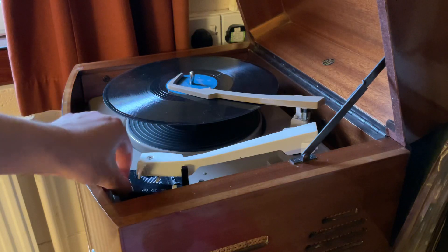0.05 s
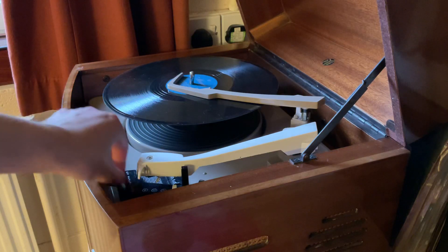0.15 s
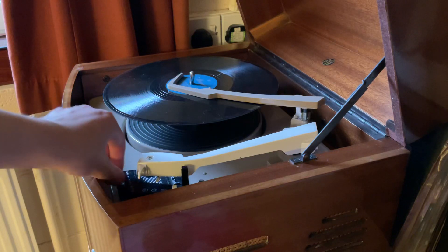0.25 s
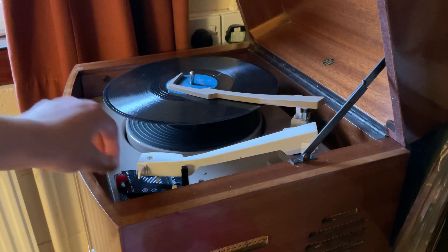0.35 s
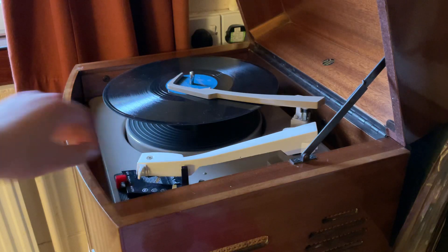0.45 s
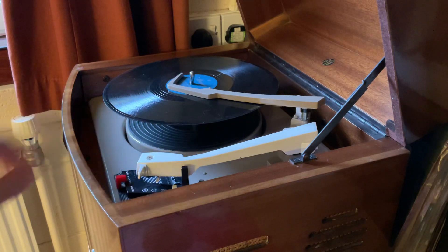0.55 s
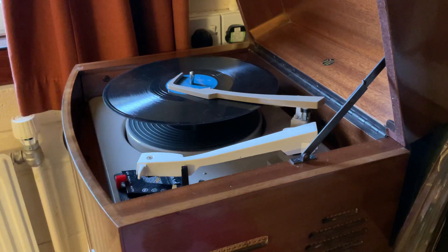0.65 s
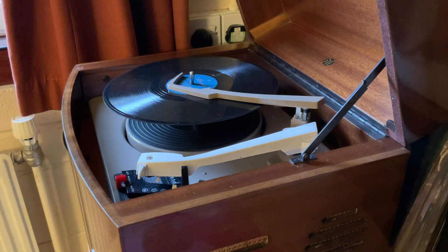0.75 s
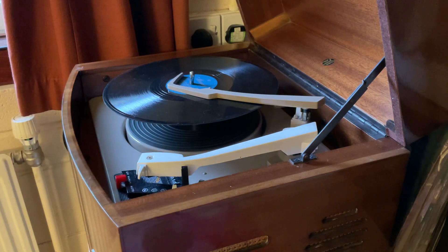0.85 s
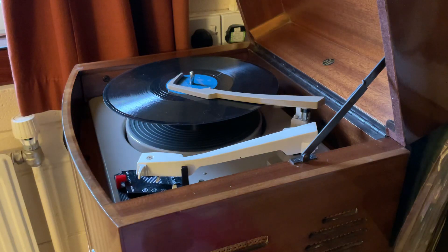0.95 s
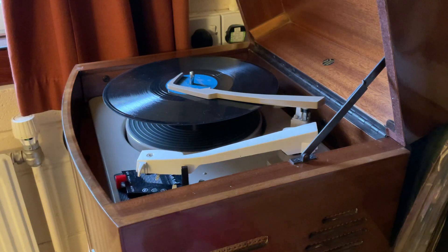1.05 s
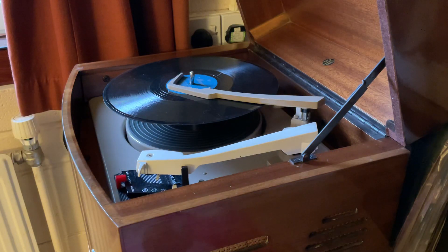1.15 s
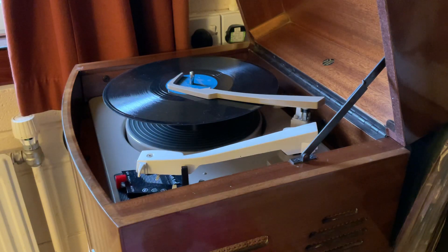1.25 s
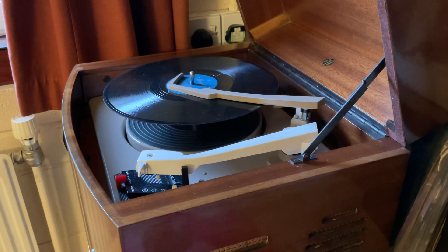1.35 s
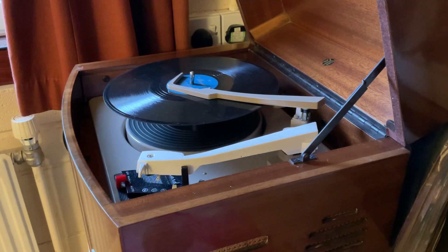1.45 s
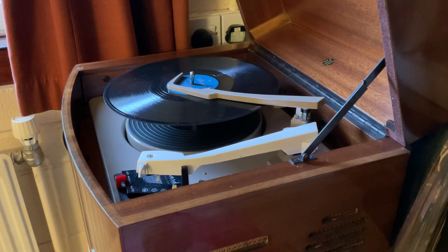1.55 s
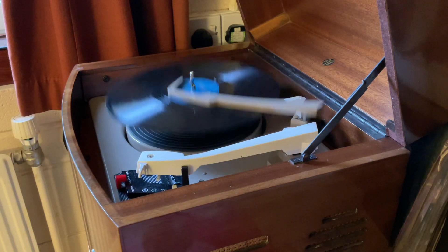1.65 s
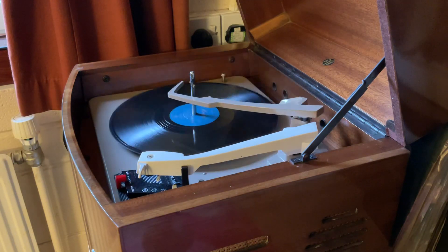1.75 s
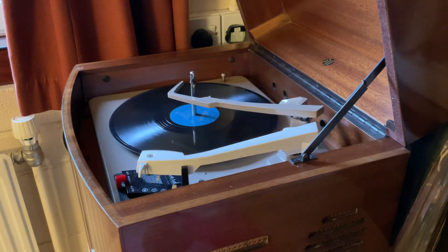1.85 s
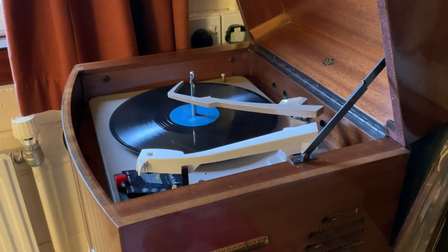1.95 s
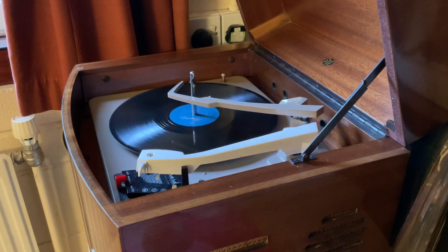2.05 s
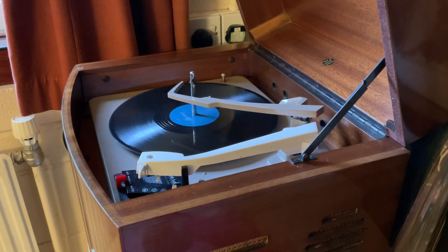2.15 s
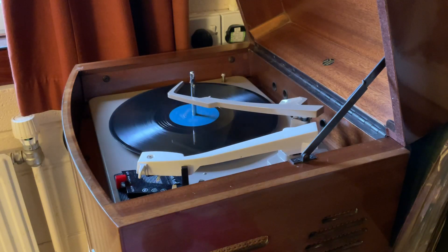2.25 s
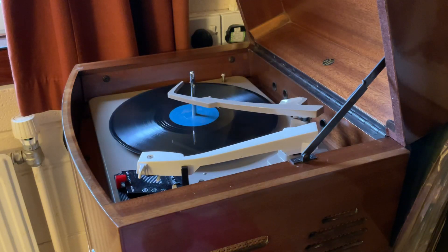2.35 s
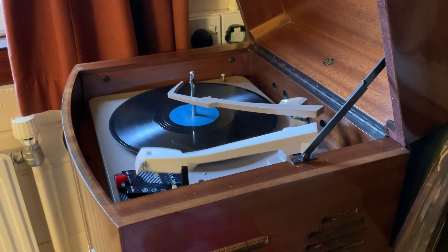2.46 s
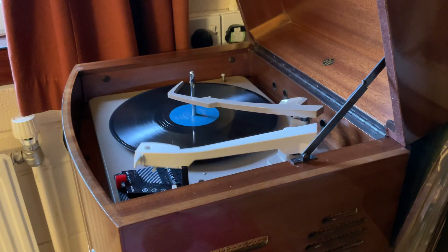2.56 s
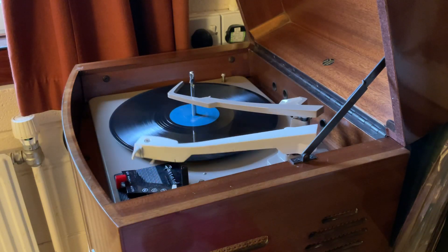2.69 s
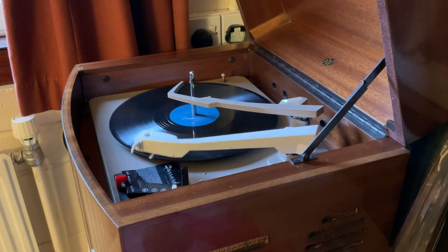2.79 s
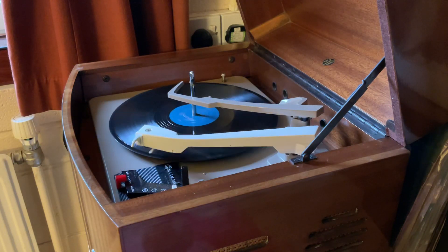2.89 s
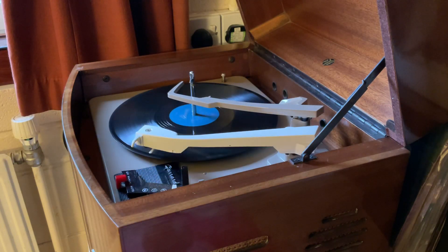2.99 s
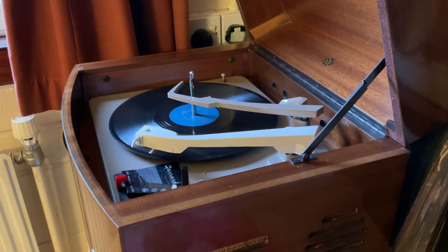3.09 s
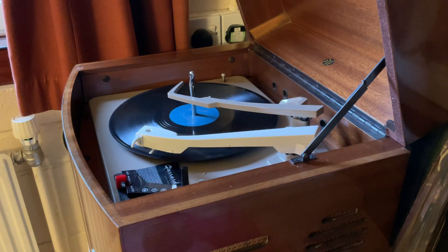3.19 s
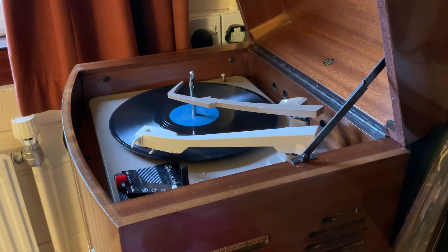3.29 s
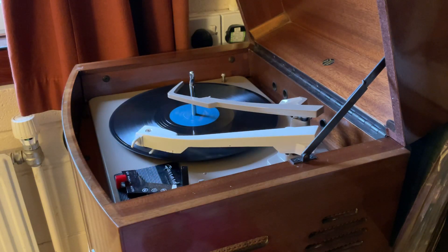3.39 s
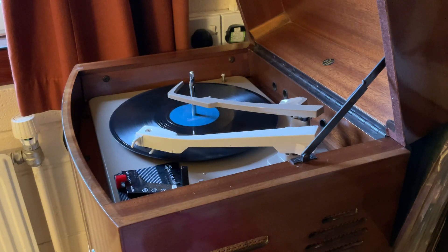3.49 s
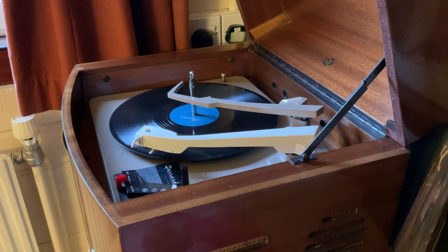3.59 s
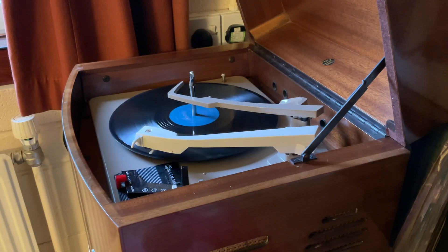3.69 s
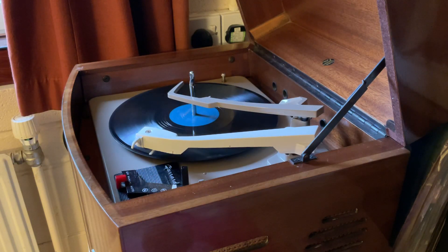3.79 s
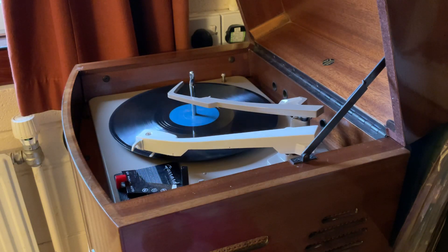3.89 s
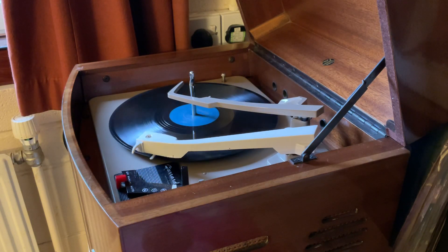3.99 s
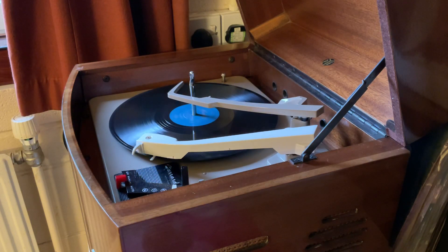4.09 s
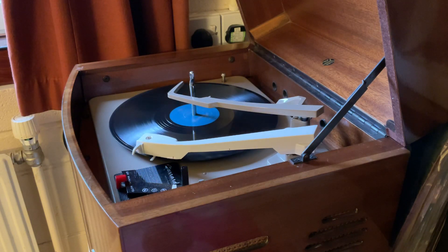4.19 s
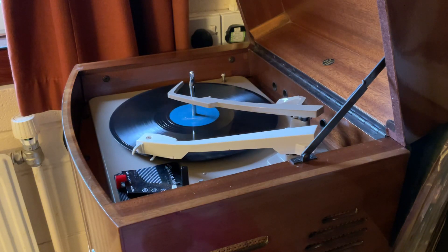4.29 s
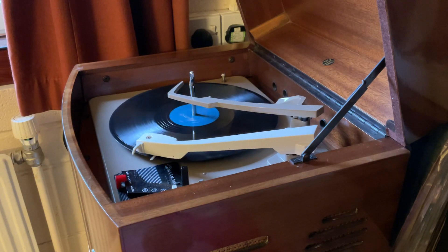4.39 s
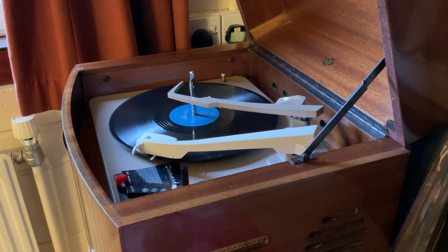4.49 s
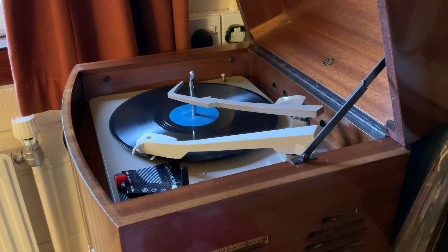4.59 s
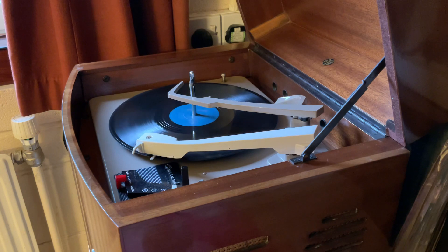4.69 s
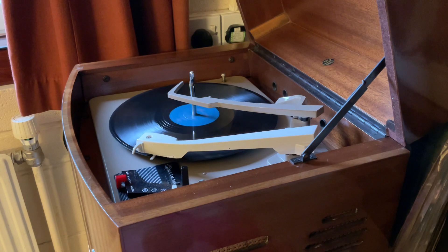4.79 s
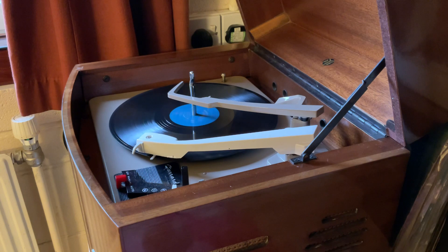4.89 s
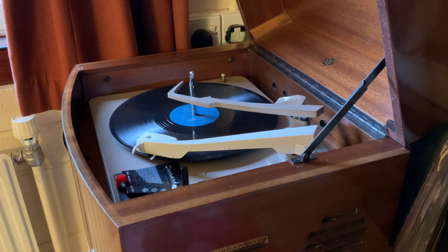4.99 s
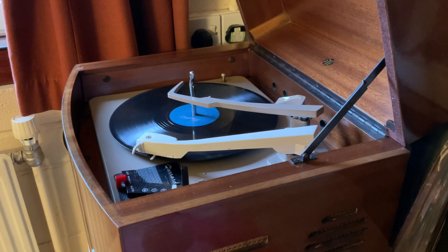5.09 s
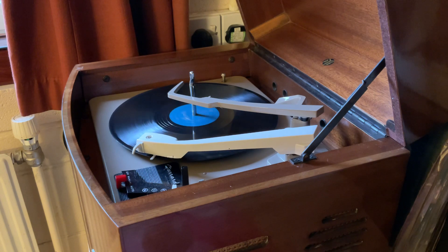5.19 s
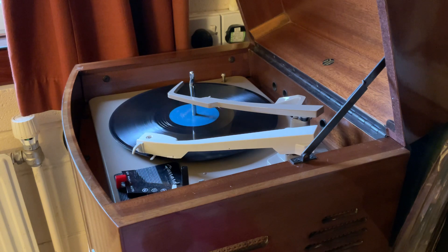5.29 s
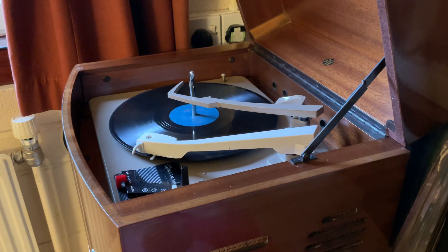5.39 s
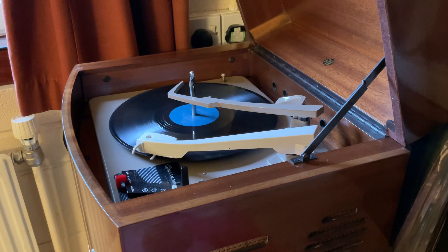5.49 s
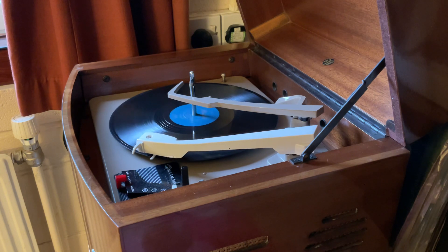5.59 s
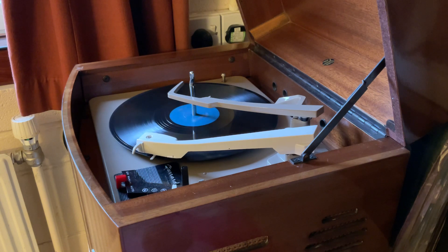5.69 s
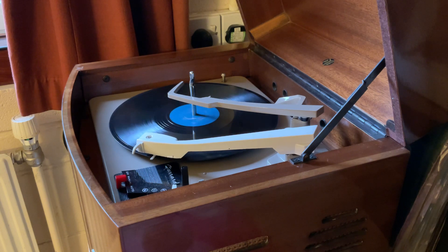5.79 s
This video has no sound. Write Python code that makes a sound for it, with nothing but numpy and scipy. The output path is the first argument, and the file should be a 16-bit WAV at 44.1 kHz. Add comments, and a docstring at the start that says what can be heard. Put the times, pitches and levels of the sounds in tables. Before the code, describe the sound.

Close stereo pickup at an open wooden record player in a quiet room. A knob clacks sharply, gears chatter faintly and a lever snaps. A record scrapes down the spindle and lands with a big clattering thump, followed by a metallic clunk. The arm mechanism ticks softly, the needle lands with clicks and booms, then light surface crackle continues over low motor hum.

```python
"""Automatic record changer

An open wooden cabinet, close by: a knob is turned, the cam gear chatters through its cycle and levers click.
A disc scrapes down the spindle and thumps on the platter; the needle lands and the groove hisses and crackles.
Levers and blows ring decaying tones of deck and cabinet; gear, scrapes and groove are shaped noise.
The motor hums throughout: two sines over low noise.
"""
import sys
import numpy as np
from scipy.fft import rfft, irfft, next_fast_len
from scipy.io import wavfile
from scipy.ndimage import map_coordinates

SR = 44100
rng = np.random.default_rng(int(sys.argv[2]) if len(sys.argv) > 2 else 0)


def master(y):
    """Save y as 16-bit WAV."""
    cut = np.clip(np.atleast_2d(y).T, -1, 1)
    pcm = np.round(cut * 32767)  # scale
    wavfile.write(sys.argv[1], SR, pcm.astype(np.int16))


N = 257940
T = np.arange(N) / SR

# Levels in the tables are nominal: the layers add fixed trims.
# Low rumble spectrum. Each row: frequency in Hz, relative density in dB.
RUMBLE_SPECTRUM = [(15, -50), (25, -23.5), (43, -19), (85, -9), (149, -6), (208, -4), (345, -12),
                   (435, -15.5), (518, -22), (1060, -26), (1220, -34.5), (1600, -35), (2270, -37),
                   (2600, -53), (3380, -83), (5720, -120)]
# Low rumble in the cabinet: motor, swell after the disc drop, groans after 4.2 s.
# Each row: time in seconds, level in dB.
RUMBLE_LEVEL = [(0, -42), (.39, -53.5), (1.68, -51.5), (1.82, -40.5), (2, -53), (2.4, -52.5), (2.7, -56),
                (3.7, -56.5), (4.2, -49), (4.6, -49.5), (5.2, -54.5), (5.85, -53.5)]
# Surface hiss of the groove. Each row: time in seconds, level in dB.
GROOVE_LEVEL = [(4.01, -84), (4.06, -68), (4.3, -72), (4.5, -68.5), (5.2, -69.5), (5.53, -75),
                (5.849, -68.5)]
# Loudspeaker spectrum. Each row: frequency in Hz, relative density in dB.
SPEAKER_SPECTRUM = [(1590, -72.5), (2700, -43.5), (3040, -43), (3310, -18), (3410, -8.5), (3700, -18),
                    (4110, -17.5), (5260, -26), (5800, -10.5), (7160, -20), (8760, -8.5), (10700, -14),
                    (11600, -5.5), (14300, 0), (16200, -6)]
# Loudest groove pops. Each row: start in seconds, level in dB, middle over that level in dB.
POPS = [(4.8349, -48.5, -13.5), (4.8816, -52, -4), (4.9033, -41.5, -11), (4.9227, -46.5, -10),
        (5.0779, -51.5, -7), (5.1151, -56.5, 8), (5.1761, -50.5, -9.5), (5.244, -46, -25),
        (5.2614, -48, -20.5), (5.3077, -48.5, -11), (5.3871, -49, -19.5), (5.5838, -49, 2),
        (5.6291, -47.5, -.5), (5.6446, -37.5, -10.5), (5.7062, -46, -19)]
# Loose parts. Each row: frequency in Hz, relative density in dB.
RATTLE_SPECTRUM = [(600, -40), (900, 5.5), (2200, 4), (3500, 1), (5000, -2.5), (8000, -3.5), (12000, -8),
                   (16000, -14)]
# Arm linkage dragging over the deck. Each row: start in seconds, hold in seconds, level in dB.
SHUFFLES = [(2.855, .08, -56)]
# Disc slipping on the spindle, then falling along it. Each row: start in seconds, hold in seconds, level in dB.
SCRAPES = [(1.606, .042, -52.5), (1.654, .064, -26)]
# Flat of the disc or a plate pushing air. Each row: centre in seconds, level in dB, pitch in Hz.
SLAPS = [(1.368, -23.5, 230), (1.6885, -12.5, 150), (1.7075, -14.5, 190), (1.739, -11.5, 240),
         (4.152, -29, 230), (4.287, -32, 200), (4.717, -23, 188)]
# Low thumps: blows on the cabinet, and needle booms from the speaker after 4.2 s.
# Each row: start in seconds, level in dB, deep and upper parts over it in dB.
THUMPS = [(.001, -29, -14.5, -5.5), (.168, -32, -14.5, -7), (.327, -32.5, -21, -6.5), (.628, -40, -23, -7),
          (.729, -39.5, -8, -8.5), (1.202, -38, -12, -11.5), (1.365, -24, -18.5, -6),
          (1.399, -27.5, -16.5, -11.5), (1.617, -31.5, -13.5, -7), (1.655, -22, -3, -2),
          (1.681, -15, -14.5, -9), (1.699, -17.5, -8.5, -1), (1.713, -17.5, -10, -1),
          (1.736, -18.5, -10, -8.5), (1.974, -35, -22, -1.5), (1.986, -30, -17.5, -5),
          (2.289, -43, -9, -4.5), (2.858, -37, -16, -8), (2.889, -41, -7, -8), (2.929, -41, -13, -8),
          (3.129, -44, -6, -3), (3.279, -47, 3, -2), (3.845, -50.5, -6, 5), (3.919, -44.5, -1, -5),
          (4.147, -34, -2, -20), (4.164, -37, 0, -7), (4.276, -36.5, -9, -25), (4.332, -38, -11, -25),
          (4.369, -39, -13.5, -25), (4.399, -42, -10, -25), (4.443, -29.5, -18.5, -7.5),
          (4.47, -40, -12.5, -5.5), (4.588, -43.5, 2, -20), (4.709, -18.5, -9.5, -9.5), (4.726, -24, 1, -9),
          (4.749, -33, 4, -12.5)]
# Cabinet panel modes. Each row: frequency in Hz, level in dB, unscaled 60 dB decay time in seconds.
CABINET_MODES = [(65, -15.5, 0.27), (110, 1, .2), (122, 0, 0.17), (165, -3, .15), (190.4, -1, 0.071),
                 (219.4, 0.5, .15), (270, -3, .15), (283, -4.5, 0.24), (314, -0.5, 0.22),
                 (382, -2.5, 0.058), (422.7, 4.5, .14), (462, 1.5, 0.17), (554, -1, .1), (640, -5, .1),
                 (732, -5, 0.11), (765, -4.5, 0.15), (904, -2.5, 0.039)]
# Contacts: lever clicks, and the falling disc's hits near 1.66-1.72 s. Each row: start in seconds, treble level
# in dB, middle and top over the treble in dB, favoured ring in Hz, ring over the treble in dB.
CLICKS = [(.0004, -26, -5.5, -5, 5230, -11), (.083, -30, -31, -7.5, 7740, -6),
          (.1094, -45, 6, -.5, 3590, -7), (.1494, -22, -9, -3, 9900, -4),
          (.2169, -44, -3.5, -22, 5560, -11), (.3196, -28.5, 5.5, -14, 2860, -8.5),
          (.602, -57, 0, -19, 4070, -28), (.622, -46, 11, -20, 4180, -7), (.6444, -55, 15, -21, 4160, -7),
          (.6604, -59, 9, -33.5, 3100, 9.5), (.723, -41.5, -2.5, -29, 3770, -3),
          (.7494, -49, 5, -21, 3630, -9), (.7855, -49.5, -.5, -22, 6060, -5),
          (.9492, -56, -5.5, -12.5, 4240, -11), (1.0006, -58, -7, -32, 3580, -2.5),
          (1.0954, -53, -7.5, -12, 4700, -9), (1.156, -58.5, -4, -22, 4360, -4),
          (1.1683, -48, 4, -37, 6100, -9.5), (1.2226, -56, 1.5, -30, 4400, 3),
          (1.3074, -60, -1, -15, 4300, -12), (1.3492, -34, -11.5, -7.5, 3600, -26),
          (1.359, -26.5, -6.5, -9, 5400, -5.5), (1.4094, -37.5, -1, -17, 5000, -5),
          (1.6062, -44, 1.5, -4.5, 7340, -1.5), (1.6195, -38.5, .5, -1, 8480, -6),
          (1.657, -17, -8, -4, 5940, -8), (1.6595, -16, -5, -2, 8870, -11),
          (1.6724, -19, -6, -10.5, 3630, -3), (1.687, -12.5, -11.5, -12, 6410, -11.5),
          (1.696, -17, -5, -7.5, 6440, -12), (1.707, -12, -1, -11.5, 5340, -9.5),
          (1.7174, -19, -2, -10, 6420, -20), (1.8023, -39.5, -15, -15, 5290, -12),
          (1.8831, -60, 4, -17.5, 5970, -7.5), (1.9687, -18.5, 1, -17.5, 3480, -11),
          (2.1196, -53.5, -1.5, -29, 4300, -7.5), (2.252, -53, -9.5, -8, 3560, -21.5),
          (2.2732, -48.5, -19, -9.5, 3890, -20), (2.29, -43.5, 13, -14.5, 4170, -8.5),
          (2.8489, -55, 10, -32, 3030, -4), (2.8775, -55.5, 10, -31, 4170, -6),
          (2.946, -66, 4, -26, 3010, -4), (3.1252, -43, -13, -9.5, 10200, -3),
          (3.27, -40.5, -.5, -6.5, 3670, -13), (3.351, -72.5, 18, -24.5, 2860, -3),
          (3.8369, -35, -16, -2.5, 6400, -8), (3.911, -38, -10, -4.5, 11700, -6),
          (3.9244, -43, .5, -4, 3560, -8.5), (4.0836, -58, 11.5, 1, 9450, -9),
          (4.128, -49.5, 14, 4, 3080, -14), (4.1603, -23, -12.5, -4, 3960, -9.5),
          (4.2626, -46.5, -8, -9, 7000, -4), (4.3859, -45, -20, -7, 4400, -15),
          (4.4393, -27.5, -15, -7.5, 12500, -2.5), (4.521, -47.5, -7, -12, 6980, -7.5),
          (4.652, -63, 15, -18, 3290, 0), (4.7042, -19.5, -8.5, -8, 10100, -8)]
# Steel deck modes. Each row: frequency in Hz, level in dB, unscaled 60 dB decay time in seconds.
DECK_MODES = [(1100, -6, 0.21), (1240, -1, 0.051), (1247.5, 0, .14), (1390, -3.5, 0.26), (1480, -6, .1),
              (1664, 3.5, .1), (1703, -1.5, 0.12), (1793, -0.5, .1), (1983, -2, 0.12), (2280, -2, .08),
              (2800, 5.5, .12), (3210, -5, .1), (3690, 2, 0.073), (4050, -1.5, .1), (4420, -4.5, 0.091),
              (4950, -9, .1), (5490, -2, .1), (5830, -5.5, 0.13), (6450, -2, .12), (7460, -4, 0.07),
              (7900, -13.5, .08), (8500, -2, .1), (9400, -10.5, 0.12), (10100, -7.5, .08),
              (11400, -3, 0.14), (12100, -4.5, .08)]
# Uneven turning of the cam gear. Each row: time in seconds, teeth ahead of a steady turn.
TEETH_AHEAD = [(.9, -.25), (1.1, -.32), (1.9, -.2), (2.3, .26), (2.7, .28), (3.3, .17), (3.5, .01),
               (3.9, .2), (4.5, .25)]
# Level and colour of the mechanism's mid noise: knob scrape, gear chatter, rumble of the disc drop.
# Each row: time in seconds, level in dB, brightness in dB per octave,
# ring of the deck's middle resonance over the level in dB.
MECHANISM_LEVEL = [(0, -64, 2, -8), (.15, -52, 0, -7), (.32, -74, -4, -4), (.45, -69, -5, -1),
                   (.7, -64.5, -4.5, -3), (1.04, -58, -2, -9.5), (1.27, -60.5, -2.5, -8.5),
                   (1.45, -76, -1, -1), (1.7, -42, -10, -23), (1.8, -46, -9, -23), (1.88, -64, -2, -4),
                   (2.15, -63, -1, -3.5), (2.42, -64, -3.5, 3), (2.67, -62.5, -4.5, 6.5),
                   (2.92, -72, 0, -6), (3.25, -68.5, -2.5, 5), (3.55, -60, -11, -4), (3.75, -63.5, -3, 8),
                   (4.1, -65, 1, -1), (4.46, -70, 3, 9), (4.8, -63, 0, -10), (4.92, -82, 0, 4),
                   (5.85, -84, -1, 4)]
# Resonances the gear excites. Each row: frequency in Hz, width in Hz, level in dB.
GEAR_PEAKS = [(592.6, 130, -4), (824, 70, 0), (1177, 95, -4), (1395, 55, -1.5), (1730, 80, -7.5),
              (2010, 100, -17.5), (2796, 120, -13), (3650, 62, -19.5), (4000, 160, -25), (4450, 78, -22.5)]
# Likeness of left and right. Each row: frequency in Hz, correlation from 0 to 1.
ALIKE = [(40, 1), (170, 0.9), (500, 1), (800, 0), (1300, 0.3), (1900, 1), (2800, .92), (4500, 1),
         (6000, .9), (9000, 1), (16000, .93)]
# Phase between channels. Each row: frequency in Hz, lead of the left in radians.
LEAD = [(50, .1), (170, .2), (690, .9), (1000, .3), (1400, 0), (1720, -.7), (2070, -1.6), (2410, -2.5),
        (2760, -3.25), (3450, -4.9), (4480, -6.2), (5500, -5.8), (6900, -5.7), (8600, -6.25), (10300, -6.5),
        (15500, -6.7)]
# Level between channels. Each row: frequency in Hz, left over right in dB.
LEAN = [(60, -.3), (170, 1.5), (400, 3), (700, 6), (1050, 3), (1400, -1.5), (2500, -.5), (5500, -2),
        (9000, 0), (16000, 0)]

HUM_HZ, TEETH_HZ, TOP_HZ = 99.913, 26.5, 15900
MIDDLE_HISS_START_S, MIDDLE_HISS_DB = 3.7, -78  # faint steady hiss near 2 kHz, to the end
SHUFFLE_RISE_DB_PER_S, SHUFFLE_FALL_DB_PER_S = 1500, 300
SCRAPE_RISE_DB_PER_S, SCRAPE_FALL_DB_PER_S = 5000, 550
DECK_WINDOW_S, CABINET_WINDOW_S = .11, .24  # each ring is followed this long
DECK_SPREAD = .025  # relative pitch scatter of the deck's tones from blow to blow
RING_SHARE, SHORTER_PER_DB = .9, .006  # share of cabinet decay time for the softest thump; harder ones ring shorter
CONTACT_S = .004  # rattle at full strength
TAIL_TURN_DB, TAIL_PER_DB, TAIL_RANGE_DB = -42, .15, (-1.5, 3)  # softer contacts leave relatively more tail
LOW_RING_HZ, LOW_RING_OCTAVES = 1420, .35  # centre and width of the lower deck modes a contact favours
DULLER_OCTAVES_PER_DB = .02  # that centre drops as the contact's middle grows
# Two higher bands of the mid noise: octaves above the lowest, level at no brightness.
UPPER_OCTAVES, TREBLE_OCTAVES, UPPER_DB, TREBLE_DB = 1.2, 2.3, .2, -10.5
MESHED_S, MESH_EASE_S = ((.55, 1.4), (1.9, 4.7)), .12  # teeth engage over these spans
WHINE_START_S, WHINE_END_S = 1.87, 3.83  # while the arm swings
WHINE_DB, WHINE_FADE_DB_PER_S = -86.5, 5.5


def amp(db):
    """Gain of a level in dB."""
    return 10 ** (np.asarray(db) / 20)


def unit(x):
    """x at rms 1."""
    return x / np.sqrt(np.mean(x ** 2) + 1e-20)


def along(points, hz):
    """(Hz, value) points interpolated on a log axis."""
    f, v = np.transpose(points)
    return np.interp(np.log(hz + 1), np.log(f + 1), v)


def curves(rows):
    """One value per sample for each column after the time."""
    s, *cols = np.transpose(rows)
    return [np.interp(T, s, c) for c in cols]


def wobble(rate_hz):
    """Smooth random curve, rate_hz knots a second."""
    return map_coordinates(rng.standard_normal(int(N * rate_hz / SR) + 4), [T * rate_hz])


def filtered(x, response):
    """x through a complex response of frequency."""
    m = next_fast_len(N + SR // 2)
    return irfft(rfft(x, m) * response(np.fft.rfftfreq(m, 1 / SR)), m)[..., :N]


def noise(spectrum, lo_hz=0, hi_hz=30000):
    """Two unrelated noises, jointly at rms 1, in a band with soft edges."""
    def response(hz):
        edges = 1 / np.sqrt((1 + (lo_hz / (hz + 1)) ** 8) * (1 + (hz / hi_hz) ** 8))
        return amp(along(spectrum, hz)) * edges
    return unit(filtered(rng.standard_normal((2, N)), response))


def resonances(peaks):
    """Causal response of (Hz, width Hz, dB) peaks, alternating in sign."""
    def response(f):
        return sum((-1) ** k * amp(db) * 1j * f * w / (c * c - f * f + 1j * f * w)
                   for k, (c, w, db) in enumerate(peaks))
    return response


def held(rows, rise_db_per_s, fall_db_per_s):
    """Level in dB of strokes that rise, hold and fall at steady rates."""
    return np.max([db - rise_db_per_s * np.maximum(s - T, 0) - fall_db_per_s * np.maximum(T - s - hold, 0)
                   for s, hold, db in rows], axis=0)


def dying(times, dbs, lengths_s, fast_s, tail_db, slow_s):
    """Envelope of bursts: contact, quick decay, then the slower answer of cabinet and room; powers add."""
    power = np.zeros(N + SR)
    t = np.arange(round(min(1.5 * slow_s, .45) * SR)) / SR
    for s, db, length, tail in np.broadcast(times, dbs, lengths_s, tail_db):
        after = np.maximum(t - length, 0)
        shape = amp(-120 * after / fast_s) + amp(2 * tail - 120 * after / slow_s)  # 60 dB decay times
        power[round(s * SR):][:len(t)] += amp(2 * db) * shape * (1 - np.exp(-t / .0016))
    return np.sqrt(power[:N])


def struck(modes, times, dbs, lasting, attack_s, spread, count, window_s):
    """Blows on one body: dbs drive each mode, a cluster of count tones; lasting scales decay times."""
    out = np.zeros((2, N + SR))
    hz, level_db, t60 = np.repeat(np.transpose(modes), count, axis=1)
    t = np.arange(round(window_s * SR)) / SR
    for s, db, scale in zip(times, np.repeat(dbs, count, axis=1), lasting):
        luck = rng.standard_normal((4, len(hz)))
        pole = 2j * np.pi * hz * (1 + spread * luck[1]) - np.log(1000) / (scale * t60)
        size = amp(db + level_db + 3.9 * luck[0]) * np.exp(3j * luck[2:])  # own phases on each path
        steps = np.broadcast_to(np.exp(pole / SR)[:, None], (len(hz), len(t)))
        tones = np.cumprod(steps, axis=1)
        start = round(s * SR)
        out[:, start:start + len(t)] += (size @ tones).imag * (1 - np.exp(-t / attack_s))
    return out[:, :N]


def motor():
    """Magnetic hum at twice the mains rate with its octave, over a lumpy low rumble and faint air noise."""
    turn = 2 * np.pi * HUM_HZ * T
    hum = -amp(-50.5 + .4 * wobble(18)) * np.cos(turn)
    hum -= amp(-50.5 + wobble(4.3)) * np.sin(2 * turn)
    # The rumble also carries the swell after the disc drop and the late groans.
    rumble = amp(curves(RUMBLE_LEVEL)[0] + 1.5 * wobble(12)) * noise(RUMBLE_SPECTRUM)
    air = amp(-87) * noise([(2000, 3.5), (6000, -11), (16000, -19.5)], lo_hz=1800)
    return hum * [[1], [0]] + rumble + air  # hum on the first path only


def groove():
    """Surface hiss, dust crackle and pops once the needle is down; a faint steady hiss near 2 kHz from 3.7 s."""
    level = amp(curves([(3.9, -120)] + list(GROOVE_LEVEL))[0] + 1.5 * wobble(12))
    dust = rng.random((110, 2))
    times = 4 + 1.84 * dust[:, 0]
    crackle = dying(times, -3 - 6 * np.log(dust[:, 1] + .02), .002, .023, -30, .06)
    hiss = level * (1.2 + .3 * crackle) * noise(SPEAKER_SPECTRUM)
    fade_in = np.clip((T - MIDDLE_HISS_START_S) / .05, 0, 1)
    middle_hiss = amp(MIDDLE_HISS_DB) * fade_in * noise([(1500, 0), (2350, 0), (2600, -25)], 1600, 2500)
    s, db, middle_db = np.transpose(POPS)
    pops = dying(s, db - 8, .003, .025, -15, .11) * noise(SPEAKER_SPECTRUM)
    pops += dying(s, db + middle_db - 6.5, .0024, .032, -9, .099) * noise(RATTLE_SPECTRUM, 902, 2400)
    return hiss + pops + middle_hiss


def shuffle():
    """The arm linkage drags over the deck: rough low noise."""
    level_db = held(SHUFFLES, SHUFFLE_RISE_DB_PER_S, SHUFFLE_FALL_DB_PER_S) + 3 * wobble(70)
    return amp(level_db) * noise([(200, 0), (350, 1), (700, -8), (1200, -14)], 220, 900)


def slide():
    """The centre hole of the disc judders down the spindle: noise of wobbling level."""
    level_db = held(SCRAPES, SCRAPE_RISE_DB_PER_S, SCRAPE_FALL_DB_PER_S) + 1.7 * wobble(140)
    return amp(level_db) * noise(RATTLE_SPECTRUM)


def slaps():
    """One push of air each: a trough between two smaller crests, no ringing, on the first path."""
    out = np.zeros((2, N))
    for s, db, hz in SLAPS:
        u = np.minimum((np.pi * hz * (T - s)) ** 2, 60)
        out[0] -= amp(db) * (1 - 2 * u) * np.exp(-u)
    return out


def thumps():
    """Blows on the cabinet, and late needle booms from the speaker: panel modes and a dull puff."""
    s, db, deep_db, upper_db = np.transpose(THUMPS)
    lasting = np.clip(RING_SHARE - SHORTER_PER_DB * (db - db.min()), .2, 3)
    hz = np.transpose(CABINET_MODES)[0]
    upper_share_db = np.where(hz > 400, upper_db[:, None] - 4, -4)
    share_db = np.where(hz < 172, deep_db[:, None] - 1.5, upper_share_db)
    puff = dying(s, db + upper_db - 8.5, .006, .1, -6, .27) * noise([(300, 0), (1000, -2)], 380, 1200)
    ring = struck(CABINET_MODES, s, db[:, None] + share_db - .5, lasting,
                  attack_s=.0051, spread=.013, count=1, window_s=CABINET_WINDOW_S)
    return puff + ring


def clicks():
    """Each contact shakes loose parts, treble dying first, and rings the deck most near a favoured pitch."""
    s, db, middle_db, top_db, ring_hz, ring_db = np.transpose(CLICKS)
    tail_db = np.clip(TAIL_PER_DB * (TAIL_TURN_DB - db), *TAIL_RANGE_DB)
    middle = dying(s, db + middle_db - 11, CONTACT_S, .05, tail_db - .6, .2) * noise(RATTLE_SPECTRUM, 900, 2900)
    treble = dying(s, db - 10.5, CONTACT_S, .035, tail_db - 5.5, .18) * noise(RATTLE_SPECTRUM, 1900, 8000)
    top = dying(s, db + top_db - 4.5, CONTACT_S, .03, tail_db - 10, .19) * noise(RATTLE_SPECTRUM, lo_hz=8000)
    # The rattle passes through the deck.
    metal = resonances([(mode_hz, .011 * mode_hz, mode_db) for mode_hz, mode_db, _ in DECK_MODES])
    rattle = filtered(middle + treble + top, lambda f: .92 + .55 * metal(f))

    hz = np.transpose(DECK_MODES)[0]

    def near(centre_hz, octaves):
        return -np.minimum(6 * (np.log2(hz / centre_hz) / octaves) ** 2, 14)

    low_hz = LOW_RING_HZ * 2 ** (-DULLER_OCTAVES_PER_DB * np.clip(middle_db, -12, 9))
    low_db = near(low_hz[:, None], LOW_RING_OCTAVES) + middle_db[:, None] - 1.5
    high_db = near(ring_hz[:, None], .2) + (hz > 8000) * top_db[:, None] * .4
    mode_dbs = (db + ring_db)[:, None] + np.where(hz < 2500, low_db, high_db) - 3.5
    ring = struck(DECK_MODES, s, mode_dbs, np.full(len(s), .6),
                  attack_s=.0006, spread=DECK_SPREAD, count=2, window_s=DECK_WINDOW_S)
    return rattle + ring


def mechanism():
    """Mid noise: gear teeth knock the deck unevenly over a grinding, plus knob scrape, drop rumble and a whine."""
    turned = TEETH_HZ * T + curves(TEETH_AHEAD)[0]
    teeth_s = np.flatnonzero(np.diff(np.floor(turned))) / SR
    luck = rng.standard_normal((len(teeth_s), 2))
    times = abs(teeth_s - .003 + .002 * luck[:, 0])
    knocks = dying(times, 2.2 * luck[:, 1], .008, .045, -18, .09)
    mesh = sum(np.clip(np.minimum(T - start, end - T) / MESH_EASE_S, 0, 1) for start, end in MESHED_S)
    drive = mesh * (knocks + .19) + (1 - mesh) * .65  # steady outside the meshed spans

    flat = [(300, 1.5), (16000, -4.5)]
    edges_hz = [(450, 1400), (1400, 1300), (1550, 2300), (2700, 6000)]
    bands = np.array([noise(flat, lo, hi) for lo, hi in edges_hz])
    body = resonances(GEAR_PEAKS)
    bands = filtered(drive * bands, lambda hz: .02 + body(hz))
    level_db, bright, ring_db = curves(MECHANISM_LEVEL)
    upper_db = UPPER_DB + UPPER_OCTAVES * bright
    treble_db = TREBLE_DB + TREBLE_OCTAVES * bright
    band_dbs = level_db + np.array([0 * T, ring_db, upper_db, treble_db])
    mid_noise = sum(amp(db) * unit(band) for db, band in zip(band_dbs, bands))

    whine = noise([(6200, -42.5), (6400, -7.5), (6600, -1), (6800, -6), (7100, -41)], 6000, 7200)
    gate = np.clip(np.minimum(T - WHINE_START_S, WHINE_END_S - T) / .05, 0, 1)
    whine_db = WHINE_DB - WHINE_FADE_DB_PER_S * (T - WHINE_START_S) + 2.5 * wobble(3) + 1.5 * wobble(25)
    return mid_noise + gate * amp(whine_db) * whine


def scene():
    """All sources on two sound paths, mixed into left and right by their likeness."""
    paths = motor() + groove() + shuffle() + slide() + slaps() + thumps() + clicks() + mechanism()

    def shares(hz):
        angle = np.arccos(np.clip(along(ALIKE, hz), -1, 1)) / 2
        return np.array([np.cos(angle), np.sin(angle)])

    same, other = filtered(paths, shares)
    return np.array([same + other, same - other])


def record(dry):
    """Channels differ in level and phase; the deepest bass is cut and nothing is kept above TOP_HZ."""
    side = np.array([[.5], [-.5]])

    def response(hz):
        band = (hz < TOP_HZ) / np.sqrt(1 + (45 / (hz + 1)) ** 6)
        return amp(side * along(LEAN, hz)) * np.exp(1j * side * along(LEAD, hz)) * band

    return filtered(dry, response)


dry = scene()
out = record(dry)
master(out)
```